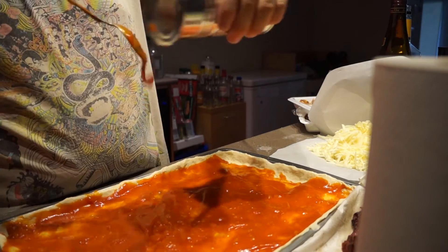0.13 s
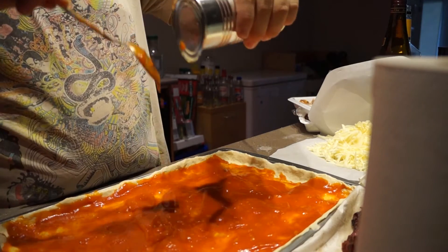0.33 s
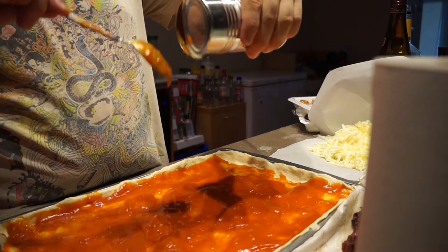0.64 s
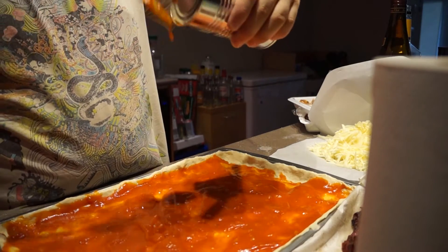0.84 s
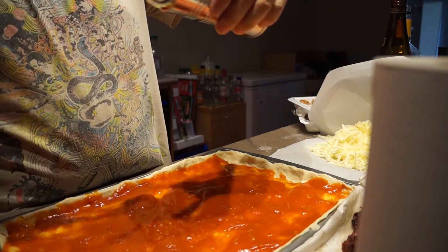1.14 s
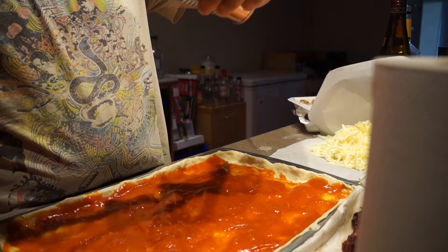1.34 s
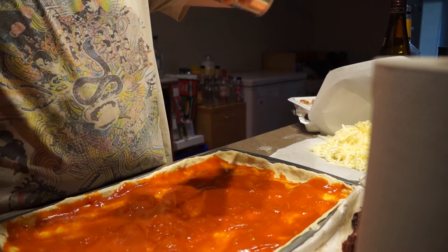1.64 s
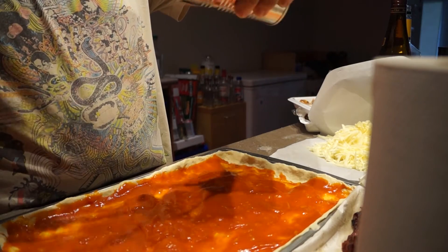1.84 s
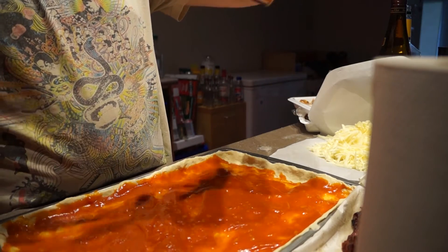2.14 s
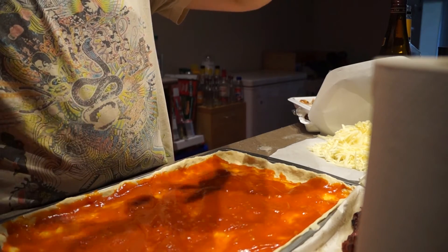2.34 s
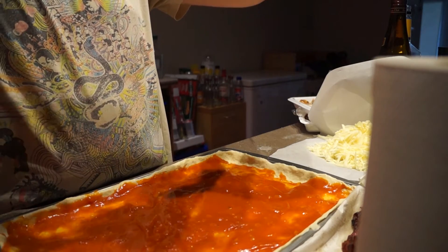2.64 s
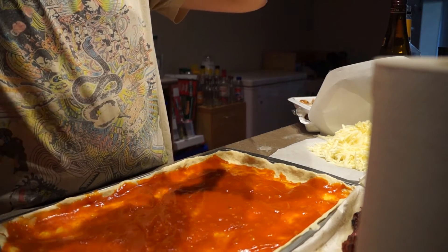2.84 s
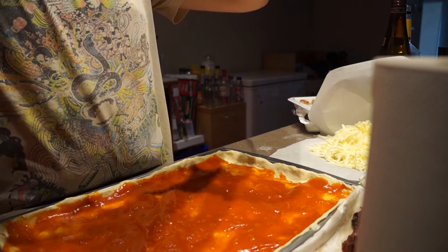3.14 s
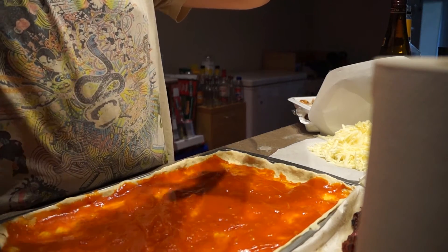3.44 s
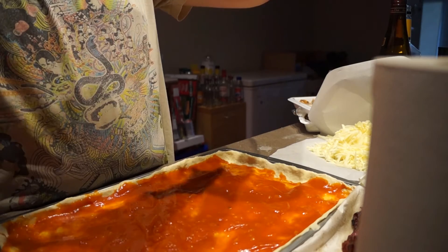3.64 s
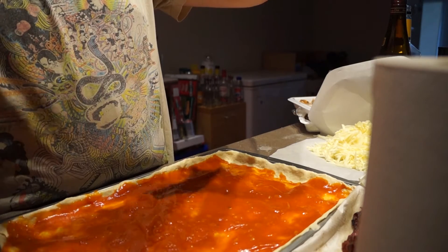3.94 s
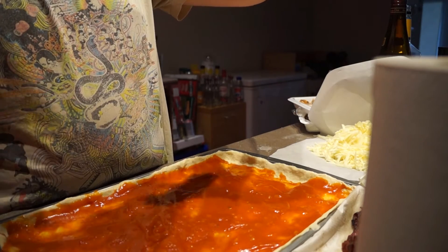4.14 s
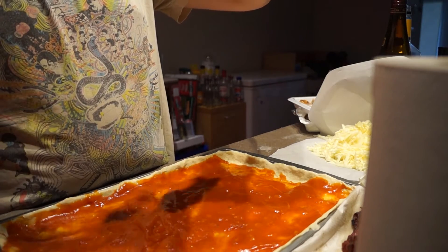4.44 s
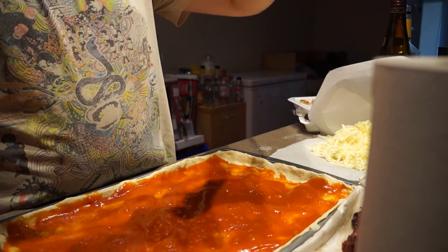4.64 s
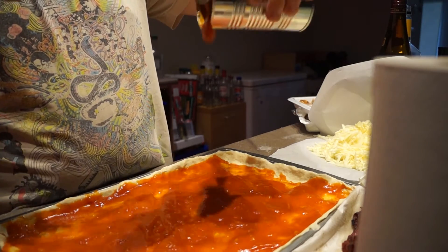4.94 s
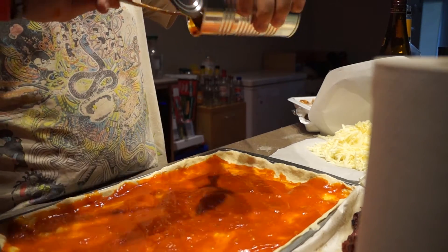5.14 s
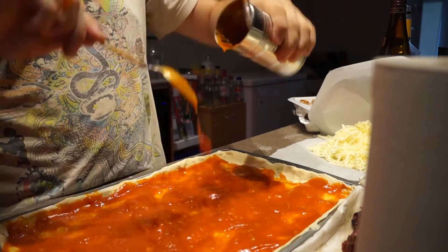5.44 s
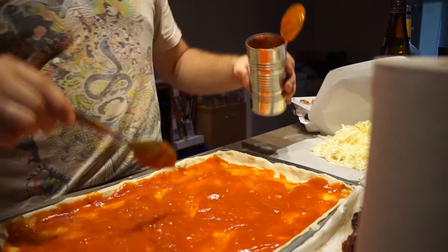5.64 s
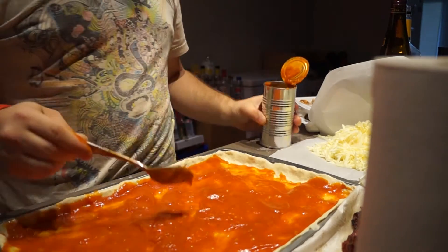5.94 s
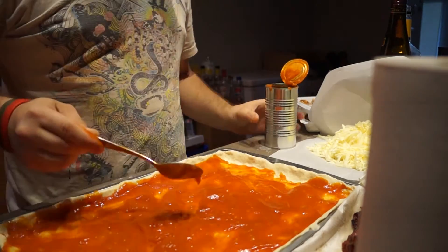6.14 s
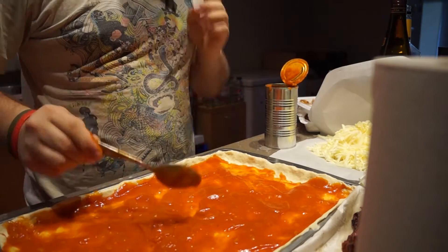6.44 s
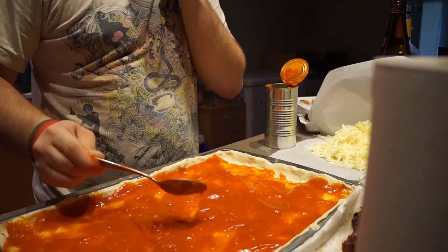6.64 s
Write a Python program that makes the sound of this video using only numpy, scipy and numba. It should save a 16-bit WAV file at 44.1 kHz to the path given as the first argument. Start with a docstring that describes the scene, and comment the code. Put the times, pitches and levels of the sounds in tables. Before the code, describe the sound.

Hollow clinks and gritty scrapes of a spoon in a tin can, ending with the can thumping down, over steady fridge hum.

```python
"""A small kitchen: over fridge hum and room noise, a steel spoon knocks and scrapes in an open tin can.
Each contact ticks and rings the air column, two low wall modes that shift with grip and sauce, and many
thin high modes; scrapes drive the can by stick-slip. At the end the can is set down on a board.
The room echoes it all, and the nearby camera's slow gain control backs off while it is loud."""
import sys
import numpy as np
from scipy import signal
from scipy.fft import rfft, irfft
from scipy.io import wavfile
from scipy.ndimage import uniform_filter1d
from numba import njit

SR = 44100
rng = np.random.default_rng(int(sys.argv[2]) if len(sys.argv) > 2 else 0)


def bounce(signal):
    """Save signal as a 16-bit WAV file at the path given by the first command-line argument."""
    frames = np.transpose(np.atleast_2d(signal))
    limited = np.clip(frames, -1, 1)
    pcm = np.round(limited * 32767).astype(np.int16)
    wavfile.write(sys.argv[1], SR, pcm)


N = 299879


def undb(db):
    return 10 ** (np.asarray(db) / 20)


def unit(x):
    return x / np.sqrt(np.mean(x ** 2))


def steady(value):
    return np.full(N, float(value))


def band(x, lo_hz, hi_hz):
    sos = signal.butter(2, [lo_hz, min(hi_hz, .45 * SR)], "bandpass", fs=SR, output="sos")
    return signal.sosfilt(sos, x)


def walk(rate_hz):
    """Smooth random drift of unit rms."""
    hold = int(SR / rate_hz)
    steps = np.repeat(rng.standard_normal(N // hold + 1), hold)
    return unit(uniform_filter1d(uniform_filter1d(steps, hold), hold)[:N])


def blows(times, size):
    """An impulse of the given size at each time."""
    x = np.zeros(N)
    x[(np.asarray(times) * SR).astype(int)] = size
    return x


def held(times, values):
    """Each value holds from its time until the next."""
    return values[np.maximum(np.searchsorted(times * SR, np.arange(N), "right") - 1, 0)]


@njit
def ring(x, hz, t60):
    """One mode whose pitch and damping may move; a unit blow gives a decaying unit sine."""
    y, z = np.empty(len(x)), 0j
    for i in range(len(x)):
        z = z * np.exp((2j * np.pi * hz[i] - np.log(1000.) / t60[i]) / SR) + x[i] + 1e-18
        y[i] = z.imag
    return y


def room_tone():
    """Fan and air noise, centred in the bass and wide on top; each octave flickers a little."""
    # noise spectrum: f/Hz, relative level/dB
    spectrum = [(20, -40), (35, -26), (53, -13), (80, -21), (120, -17.5), (200, -5.5), (330, -7),
                (575, -11.5), (911, -7.5), (1230, -8), (1500, -15), (2300, -14.5), (3100, -24.5),
                (4300, -18), (5570, -23.5), (8000, -31), (11600, -36.5), (14500, -48), (16000, -58)]
    # likeness of left and right: f/Hz, correlation/0-1
    correlation = [(60, 0.97), (500, 0.89), (2000, 0.68), (6000, 0), (16000, 0)]
    hz = np.maximum(np.fft.rfftfreq(N, 1 / SR), 1)

    def curve(points):
        f, value = np.transpose(points)
        return np.interp(np.log(hz), np.log(f), value)

    shape, alike = undb(curve(spectrum)), curve(correlation)
    mid, side = rfft(rng.standard_normal((2, N)))
    stereo = shape * (np.sqrt(1 + alike) * mid + np.sqrt(1 - alike) * np.array([side, -side]))
    noise = 0
    for octave in range(4, 15):
        share = np.clip(1 - np.abs(np.log2(hz) - octave), 0, 1)
        noise += irfft(stereo * share, N) * undb(walk(8.5))
    return unit(noise) * undb(-41)


def fridge():
    """Two hum lines that waver slightly in level."""
    # hum lines: f/Hz, rms level/dB
    lines = [(120, -49.5), (240, -55.5)]
    t = np.arange(N) / SR
    return sum(np.sqrt(2) * undb(db + 0.31 * walk(6)) * np.sin(2 * np.pi * f * t) for f, db in lines)


def slips(per_s, spread_db):
    """Stick-slip: dense clicks of very uneven size."""
    when, strength, polarity = rng.random((3, N))
    size = undb(-spread_db * np.log(1 - strength)) * np.sign(polarity - .5)
    return unit((when < per_s / SR) * size)


def scrapes():
    """The spoon slides in strokes: fine grit feeds the rasp, a coarser rub drives the low modes."""
    # rasp envelope, one list of points a stroke: t/s, level/dB
    strokes = [
        [(.06, -58), (.125, -32.5), (.15, -53), (.2, -60)],
        [(1.3, -52), (1.4, -37), (1.5, -40.5), (1.545, -26), (1.6, -36), (1.65, -28.5), (1.72, -33.5),
         (1.85, -46.5)],
        [(2.09, -37.5), (2.18, -25.5), (2.22, -27), (2.27, -38.5)],
        [(2.32, -37.5), (2.38, -37), (2.45, -30), (2.55, -53)],
        [(2.61, -33.5), (2.64, -34.5), (2.75, -36), (2.9, -45.5)],
        [(3.05, -38), (3.11, -38), (3.14, -24), (3.18, -24.5), (3.22, -38), (3.29, -42), (3.35, -35),
         (3.42, -53)],
        [(3.55, -45), (3.7, -40.5), (3.79, -28), (3.87, -38.5), (3.95, -42)],
        [(4.11, -73), (4.27, -36.5), (4.43, -40), (4.48, -31), (4.6, -35), (4.66, -34), (4.79, -38),
         (4.88, -52.5)],
        [(5.12, -35), (5.17, -46), (5.21, -34), (5.245, -27.5), (5.28, -29), (5.35, -44), (5.42, -48)],
        [(6.02, -53), (6.07, -43.5), (6.22, -54)],
    ]
    # each stroke's rub over its rasp: level/dB
    rub_boosts = [9, 4, 0.5, 1.5, -3, -6, -6.5, 3, -4, 17.5]
    points = []
    for stroke, boost in zip(strokes, rub_boosts):
        faded = [(stroke[0][0] - .01, -90), *stroke, (stroke[-1][0] + .02, -90)]
        points += [(t, db, db + boost) for t, db in faded]
    times, *levels = np.transpose(points)
    rasp, push = [undb(np.interp(np.arange(N) / SR, times, db)) for db in levels]
    grit = slips(per_s=3000, spread_db=2.5)
    rub = slips(per_s=400, spread_db=3.5) * push
    return rasp, grit, rub


def contacts():
    """The spoon's single knocks, the can's landing on the board at the end, and the spoon's even clicks across
    the wall's ribs, in time order."""
    # knocks, the last three as the can is set down on the board: t/s, tick/dB, air column/dB, wall/dB, wall
    # f/Hz, wall t60/s, second wall mode/dB, air overtone/dB, clink/dB, clink f/Hz, treble over tick/dB
    knocks = [(0.1017, -45, -24.5, -21.5, 754, 0.14, -40, -38, -36, 4240, -6),
              (1.275, -12.5, -24.5, -19, 753, 0.11, -37, -46, -19, 2460, -28),
              (1.3252, -14, -23, -17.5, 724, 0.15, -25, -18.5, -25, 4430, -12),
              (1.3473, -10.5, -7.5, -11.5, 751, 0.16, -17, -11, -14, 4090, -11),
              (1.5638, -6.5, -19, -11.5, 750, 0.18, -35, -20, -12, 4250, -4),
              (1.5764, -10, -24, -36, 722, 0.079, -40.5, -21, -11, 3090, -14),
              (1.6914, -13, -52, -32, 742, 0.14, -30, -16, -22, 4100, -3),
              (1.7054, -11, -11.5, -42, 712, 0.093, -31, -22, -37, 4010, -14),
              (2.0735, -5, -21, -18.5, 762, 0.16, -25, -20.5, -10, 3816, -13),
              (2.3864, -40, -39, -22.5, 752, 0.089, -44, -47, -26, 4260, -10),
              (2.4049, -14.5, -19, -32.5, 743, 0.18, -50, -36, -30, 2260, 1),
              (2.4748, -21, -31, -42, 760, 0.088, -50, -45, -26, 3570, -2),
              (2.4961, -15, -20, -19, 774, 0.14, -50, -45, -24, 3680, -15),
              (2.5331, -14, -12, -3, 862, 0.067, -26, -8.5, -16.5, 2560, -7),
              (2.6354, -17.5, -5.5, -11, 727, 0.14, -19, -11.5, -37, 4160, -6),
              (2.6464, -11.5, -34, -11.5, 798, 0.34, -16.5, -15, -16, 4130, -18),
              (2.7659, -8.5, -22, -27.5, 766, 0.086, -37, -32, -14, 3840, -6.5),
              (2.9691, -24, -50, -53, 770, 0.11, -45, -54, -45, 4600, -15),
              (2.9789, -19, -36, -34, 796, 0.11, -49, -45, -26, 4070, -1),
              (3.0051, -20, -26.5, -49, 788, 0.1, -48, -50, -29, 4340, -34),
              (3.0441, -7.5, -7.5, -3.5, 793, 0.26, -34, -8.5, -25, 4300, -3),
              (3.1418, -7.5, -7, -2.5, 830.7, 0.18, -26, -14.5, -9, 2960, -26),
              (3.1794, -15, -10, -10, 780, 0.13, -29, -7.5, -15, 3760, -7),
              (3.2943, -19, -28, -25, 800, 0.1, -48, -23, -19, 2370, -8),
              (3.5395, -15.5, -26.5, -25, 774, 0.13, -40, -39, -46, 4120, -28),
              (3.5987, -19.5, -27, -27, 680, 0.057, -40, -38, -31, 4070, -22),
              (3.6456, -11.5, -14.5, -0.5, 821, 0.083, -27.5, -10.5, -9, 3270, -12),
              (3.7644, -2.5, -23, -11.5, 818, 0.097, -22.5, -11.5, -12, 3800, -24),
              (3.9706, -14.5, -54, -27.5, 830, 0.061, -42, -26.5, -30, 3300, -7),
              (4.1031, -15, -10.5, -3, 854, 0.081, -28, -9, -15.5, 3340, -15),
              (4.1485, -9.5, -11.5, -17, 793, 0.089, -31, -14.5, -19.5, 2900, -19),
              (4.2374, -5, -29, -1, 809.5, 0.11, -18, -8.5, -17, 2590, -9),
              (4.7426, -15.5, -38, -17, 693, 0.17, -47, -20.5, -31, 3330, -16),
              (4.7691, -18.5, -15.5, -41, 820, 0.092, -51, -39, -34, 3330, -2.5),
              (5.1106, -9.5, -45, -16.5, 795, 0.045, -37, -16, -7.5, 4210, -9),
              (5.2304, -22, -40, -23.5, 732, 0.13, -46, -23, -18, 3800, 3),
              (5.249, -12.5, -20.5, -18.5, 779, 0.13, -42, -18, -10, 4040, 2),
              (5.2734, -23, -44, -32, 822, 0.094, -43.5, -26, -20, 4200, -9),
              (5.3055, -17, -22, -31, 802, 0.13, -49, -40, -19, 3180, -4),
              (6.013, -41, -4, -9, 805.6, 0.38, -37, -17.5, -36, 4340, -10),
              (6.0594, -45, -8, -13.5, 820, 0.32, -27, -18, -43, 2200, -9),
              (6.2487, -32, -32, -30, 810, 0.39, -50, -36, -51, 2220, -4)]
    # drags over the ribs: first t/s, last t/s, then a knock's columns from tick on
    rib_runs = [(1.6112, 1.6555, -14, -13, -9.5, 747, 0.28, -37, -25, -26, 4030, 0),
                (4.5055, 4.6823, -19, -18.5, -23.5, 800.6, 0.19, -48, -21.5, -25, 3940, -2)]
    ribs = np.array([(t, *tone) for (first, last, *tone), clicks in zip(rib_runs, (6, 10))
                     for t in np.linspace(first, last, clicks)])
    # rib clicks vary in their levels and clink pitch
    ribs += rng.standard_normal(ribs.shape) * [0, 2.5, 2.5, 2.5, 0, 0, 2.5, 2.5, 2.5, 327, 0]
    rows = np.vstack([knocks, ribs])
    times, *columns = rows[np.argsort(rows[:, 0])].T
    names = "tick air wall wall_hz wall_t60 second overtone clink clink_hz treble".split()
    return times, dict(zip(names, columns))


def modes(table, times, hit_db, friction, scatter_db):
    """A struck and rubbed mode bank; every blow lands elsewhere, so it weights and signs them anew."""
    chance = 2 * rng.random((len(times), 2 * len(table))) - 1
    sound = 0
    for k, (f, db, t60) in enumerate(table):
        size = undb(hit_db + scatter_db * chance[:, k]) * np.sign(chance[:, -1 - k])
        sound += undb(db) * ring(blows(times, size) + friction, f * (1 + 0.0039 * walk(20)), steady(t60))
    return sound


def air_column(times, hits, rub, spot):
    """The air in the can rings hollow; one overtone follows the wall pitch and the spot struck."""
    # low air modes: f/Hz, level/dB, t60/s
    hollow = [(611.9, 2, 0.27), (586.4, -10.5, 0.43), (625.3, -11, 0.36), (734, -5, 0.11)]
    # air overtones: f/Hz, level/dB, t60/s
    overtones = [(1751, 4, 0.11), (1792, -1, 0.15), (1854, 7, 0.12), (1890, -4.5, 0.012),
                 (1970, -1.5, 0.04)]
    air = modes(hollow, times, hits["air"] - 3, undb(-28.5) * rub, scatter_db=-1.5)
    air += modes(overtones, times, hits["overtone"] - 8, undb(-39) * rub, scatter_db=4)
    overtone_hz = held(times, 2.33 * hits["wall_hz"] + 37 * spot)
    return air + ring(blows(times, undb(hits["overtone"])), overtone_hz, steady(0.09))


def wall(times, hits, rub):
    """Two low wall modes, retuned at each contact as grip and sauce shift."""
    hz, t60 = held(times, hits["wall_hz"]), held(times, hits["wall_t60"])
    first_drive = blows(times, undb(hits["wall"])) + undb(-23.5) * rub
    second_drive = blows(times, undb(hits["second"])) + undb(-52) * rub
    first = ring(first_drive, hz * (1 + 0.0032 * walk(34)), t60)
    return first + ring(second_drive, 1.66 * hz, steady(0.22))


def thin_metal(times, hits, friction):
    """Sheet and spoon ring high and thin, with a short clink pitched anew by each blow."""
    # sheet and spoon modes: f/Hz, level/dB, t60/s
    partials = [(2255, -3, 0.056), (2300, -22, 0.036), (2550, -7.5, 0.15), (2770, -14, 0.13),
                (3020, -13, 0.055), (3105, -16.5, 0.17), (3313, -4, 0.1), (3260, -24, 0.084),
                (3610, -21, 0.13), (3900, -5, 0.044), (3995, -2, 0.063), (4360, -3, 0.081),
                (4675, -9, 0.14), (5500, -32, 0.052), (5560, -19.5, 0.11), (6220, -38, 0.075),
                (6880, -3.5, 0.046), (7100, -24, 0.04)]
    force_db = 0.47 * hits["wall"] + (1 - 0.47) * hits["tick"]
    sheet = modes(partials, times, force_db - 15.5, undb(-32) * friction, scatter_db=11)
    clink_hz = held(times, hits["clink_hz"]) * (1 + 0.015 * walk(60))
    clink = ring(blows(times, undb(hits["clink"])), clink_hz, steady(0.035))
    return band(sheet + clink, 1460, 20000)


def tick_and_rasp(times, hits, rasp, grit):
    """Steel on tin: milliseconds of broad noise per blow, a grainy rasp per stroke, partly wide."""
    fade = np.exp(-np.arange(600) / (.003 * SR))
    grain = rasp * unit(np.convolve(np.abs(grit), fade[:200] ** 5)[:N])
    bite = np.convolve(blows(times, undb(hits["tick"])), fade)[:N] + grain
    shine = np.convolve(blows(times, undb(hits["tick"] + hits["treble"])), fade ** 2)[:N]
    shine += undb(-19.5) * grain
    mid, side = rng.standard_normal((2, N))
    noise = mid + 0.75 * np.array([side, -side])
    return bite * unit(band(noise, 1200, 7000)) + shine * unit(band(noise, 6000, 15000))


def spoon_in_can():
    """Knocks and scrapes excite the same modes; where the spoon lands shifts an overtone and the pan."""
    times, hits = contacts()
    spot, side = 2 * rng.random((len(times), 2)).T - 1
    rasp, grit, rub = scrapes()
    body = air_column(times, hits, rub, spot) + wall(times, hits, rub)
    # the low modes take a moment of push to build up, and so small a body radiates no bass
    body = signal.lfilter([.1], [1, -.9], body)
    body = band(band(body, 480, 5000), 480, 5000) * undb(2.5)
    can = body + thin_metal(times, hits, rasp * grit) + tick_and_rasp(times, hits, rasp, grit)
    pan_db = uniform_filter1d(held(times, 0.5 + 4 * side), size=64)
    return can * undb(np.array([pan_db, -pan_db]) / 2)


def echo(x):
    """The kitchen's short stereo tail: decaying noise bands, the top octave dying first."""
    # reverb octaves: f/Hz, t60/s, level/dB
    octaves = [(344, 0.41, -1.5), (740, 0.54, -3.5), (1390, 0.7, -2), (2960, 0.57, -3.5), (5430, 0.7, -9.5),
               (10600, 0.12, 0)]
    t = np.arange(SR // 2) / SR
    tail = 0
    for f, t60, db in octaves:
        noise = band(rng.standard_normal((2, len(t))), f / np.sqrt(2), f * np.sqrt(2))
        tail += undb(db - 60 * t / t60) * np.sqrt(14 / t60 / SR) * noise
    mid = tail.mean(0)
    narrowed = 1.134 * mid + 0.55 * (tail - mid)
    onset = np.minimum(t / 0.00078, 1)
    return signal.fftconvolve(x[None], narrowed * onset, axes=1)[:, :N]


def set_down(at_s):
    """The can's base thumps the board and both ring."""
    # board and can base modes: f/Hz, level/dB, t60/s
    thud = [(321, -26, 0.27), (403, -19.5, 0.048), (445, -20.5, 0.066), (543, -45, 0.087),
            (1004, -23, 0.072), (1220, -22, 0.082), (1294, -27, 0.28), (1550, -26, 0.12),
            (2110, -33, 0.087), (2360, -24, 0.051), (3250, -31, 0.023), (4140, -23, 0.021)]
    landing = blows([at_s], 0.95)
    return band(sum(undb(db) * ring(landing, steady(f), steady(t60)) for f, db, t60 in thud), 250, 5300)


def scene():
    direct = spoon_in_can() + set_down(at_s=6.013)
    return direct + echo(direct.mean(0)) + room_tone() + fridge()


@njit
def follow(x, attack_s, release_s):
    """Envelope that rises and falls at its own rates."""
    y, level = np.empty(len(x)), 0.
    for i in range(len(x)):
        level += (x[i] - level) / (SR * (attack_s if x[i] > level else release_s))
        y[i] = level
    return y


def record(dry):
    """Slow gain control ducks loud stretches and recovers over seconds; peaks round off, the top is cut."""
    loudness = follow(np.abs(dry).mean(0), attack_s=.5, release_s=2.5)
    gain = np.minimum(undb(-38.5) / (loudness + 1e-9), 1) ** 0.23
    rounded = 0.69 * np.tanh(dry * gain / 0.79)
    return signal.sosfilt(signal.ellip(8, .2, 70, 15900, fs=SR, output="sos"), rounded)


dry = scene()
out = record(dry)
bounce(out)
```